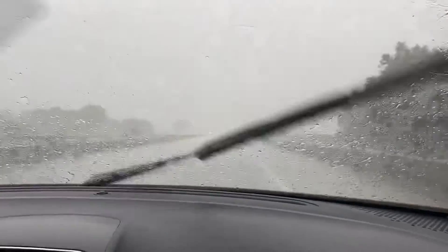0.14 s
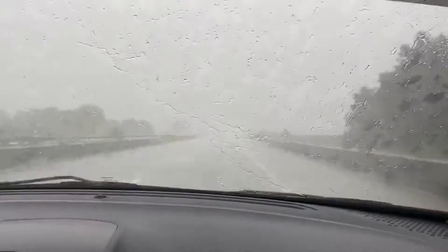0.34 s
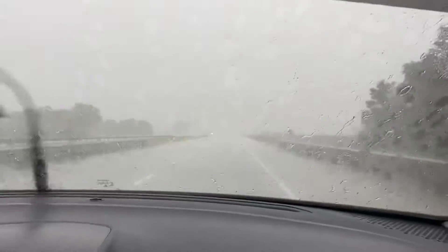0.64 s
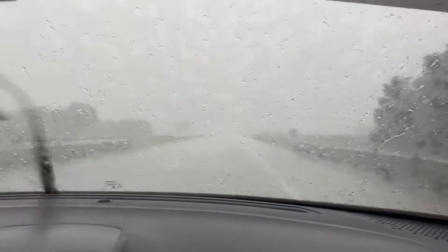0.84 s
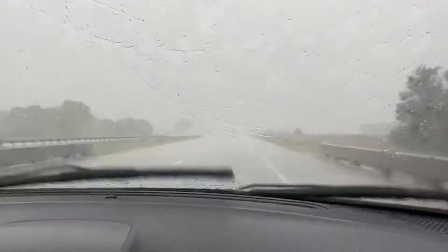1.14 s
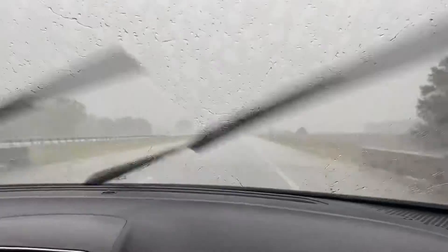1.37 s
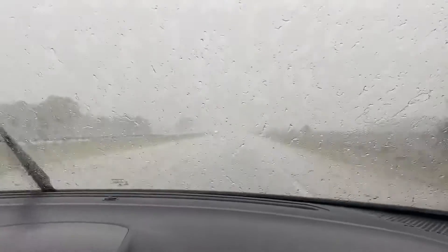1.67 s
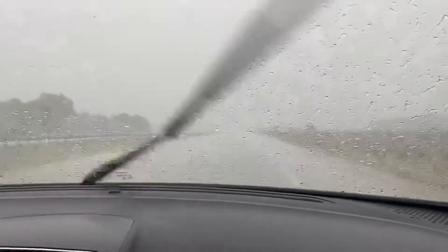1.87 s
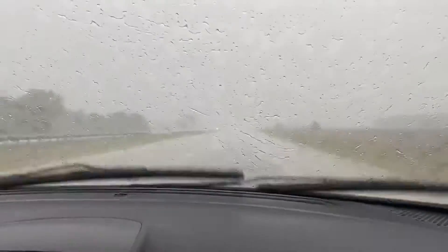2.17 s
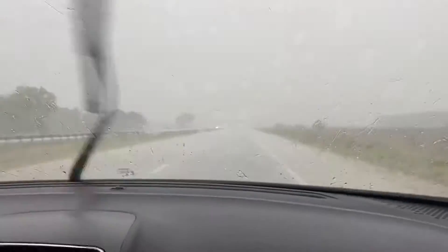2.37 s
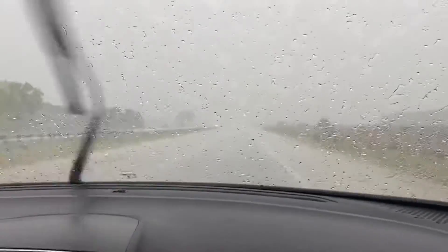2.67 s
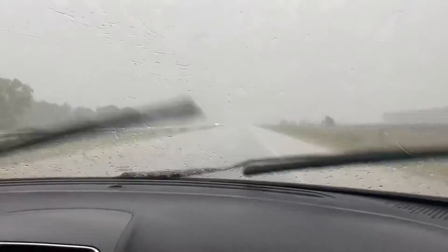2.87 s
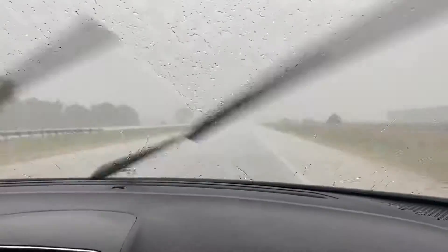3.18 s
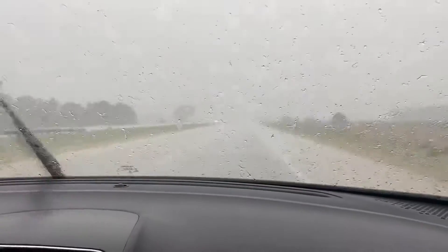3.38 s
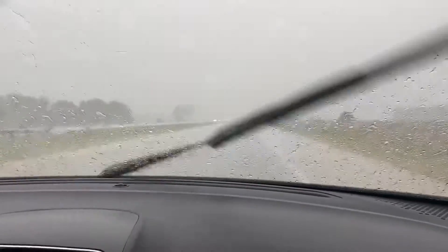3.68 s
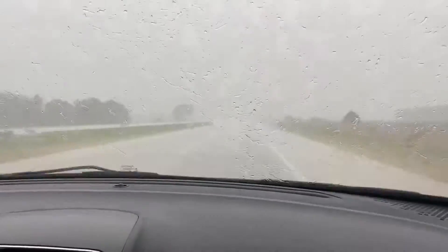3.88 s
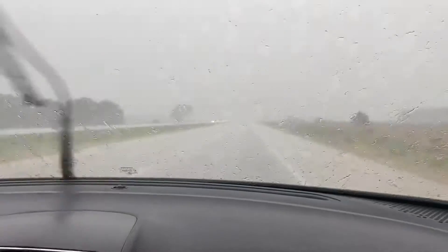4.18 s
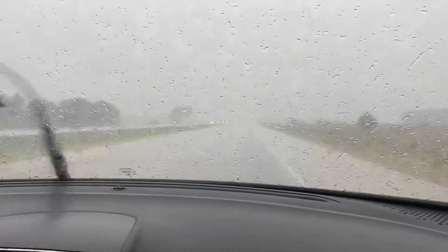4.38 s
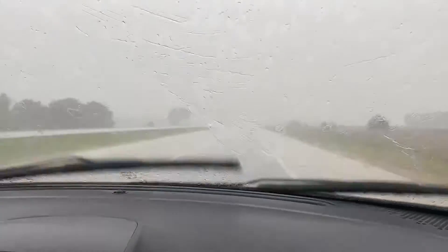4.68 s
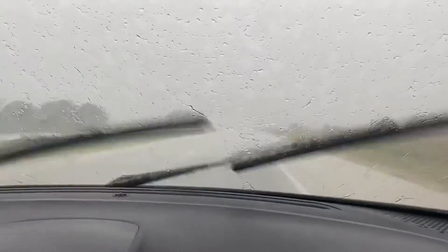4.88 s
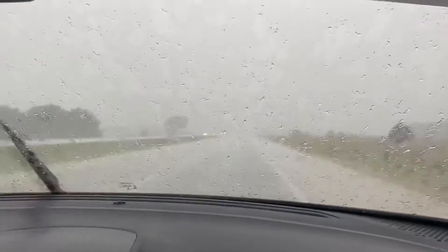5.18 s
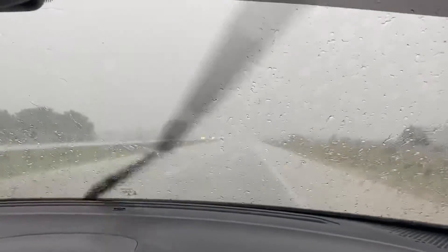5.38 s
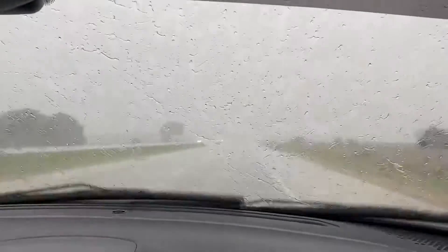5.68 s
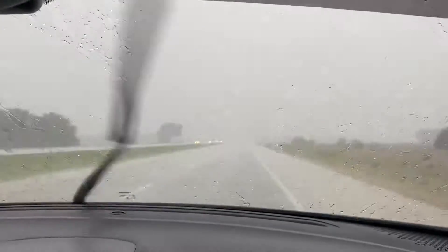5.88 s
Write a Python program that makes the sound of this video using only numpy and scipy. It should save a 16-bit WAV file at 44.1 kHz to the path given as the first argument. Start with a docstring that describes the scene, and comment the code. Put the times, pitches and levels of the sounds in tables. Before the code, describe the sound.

Inside a car driving through a downpour, thousands of drops merge into a dense, steady hiss with fine glassy ticks and occasional bright splats. Underneath runs a low tyre roar with a faint wavering panel hum. Low road thumps, often doubled, crowd the first two and a half seconds, strongest near the start and again just after two seconds; then the ride smooths out. Close stereo microphone in the cabin, short and soft reverberation.

```python
"""Heavy rain on the windshield and roof of a car driving on a wet road, heard from the cabin.
Thousands of drops, made of flickering noise, merge into a hiss, with short glassy ticks and big splats.
Below it the tyres roar (coloured noise, a humming panel and body resonances). Low thumps of the road,
many in pairs a tenth of a second apart, and a few short dull knocks are tones that swell and fade."""
import sys
import numpy as np
from scipy import signal
from scipy.fft import rfft, irfft
from scipy.io import wavfile
from scipy.ndimage import uniform_filter1d

SR = 44100
rng = np.random.default_rng(int(sys.argv[2]) if len(sys.argv) > 2 else 0)


def file_out(sig):
    """Save sig as 16-bit WAV at sys.argv[1]."""
    # one column per channel
    cols = np.atleast_2d(sig).T
    # limit, then scale
    lim = np.clip(cols, -1, 1)
    pcm = np.round(lim * 32767).astype(np.int16)
    wavfile.write(sys.argv[1], SR, pcm)


N = 265923

# How strong the layers are over the drive.
# Each row: time in seconds, rain level in dB, tyre roar level in dB, road texture level in dB.
DRIVE_LEVELS = [(0, -24.5, -24.5, -25), (.4, -24, -24, -22), (.6, -24, -25, -26.5),
                (.85, -25, -25.5, -25.5), (1.1, -25, -26, -25.5), (1.35, -24.5, -25.5, -25),
                (1.6, -24, -26, -21), (1.9, -26, -25.5, -24.5), (2.2, -25, -25, -25.5),
                (2.5, -25.5, -27, -25), (2.58, -25.5, -27.5, -27), (2.9, -26, -26.5, -29),
                (3.2, -26.5, -28.5, -27), (3.5, -25.5, -26, -27.5), (3.75, -26.5, -27.5, -28.5),
                (4.0, -25.5, -26, -27), (4.3, -25.5, -25.5, -26), (4.7, -25.5, -27, -27),
                (5.05, -26, -26.5, -30.5), (5.5, -25.5, -26.5, -26), (6.03, -25, -26.5, -27.5)]
# Colour of rain through glass and roof lining. Each row: frequency in Hz, relative level in dB.
RAIN_COLOUR = [(500, -14), (1000, -6.5), (1330, -5), (1550, -5), (1750, -2.8), (1950, -2.2), (2120, -.7),
               (2400, .4), (2800, -1.1), (3250, -.6), (3450, -2.2), (3900, -3.4), (4400, -3.9),
               (4750, -6.3), (5100, -7), (5700, -8.8), (6150, -8.8), (6700, -10), (7300, -9.5),
               (8000, -10.5), (8350, -12.5), (9000, -12), (12200, -17), (13000, -19), (15600, -23.5)]
# The largest drops on the glass. Each row: start in seconds, level in dB.
BIG_DROPS = [(0.9506, -12), (.9648, -17), (1.6506, -18), (1.7278, -15.5), (2.088, -22), (2.3062, -16),
             (2.3755, -20), (2.6582, -14.5), (3.069, -19), (3.542, -15), (3.838, -18), (4.3, -17),
             (5.137, -16.5), (5.323, -19), (5.7089, -17), (5.883, -21), (6.005, -17)]


def gain_of(db):
    """Turns decibels into a factor for the amplitude."""
    return 10 ** (np.asarray(db) / 20)


def evened(x):
    """Scales a sound to an rms (average strength) of 1."""
    return x / np.sqrt(np.mean(x ** 2) + 1e-20)


def read(hz, points, values):
    """Reads a curve of straight lines on a log-frequency axis."""
    return np.interp(np.log(hz + 1), np.log(np.asarray(points) + 1), values)


def colour(x, spectrum):
    """Makes some pitches louder than others, by a table of Hz and dB, and evens the result."""
    hz = np.fft.rfftfreq(N, 1 / SR)
    gain = gain_of(read(hz, *np.transpose(spectrum)))
    return evened(irfft(rfft(x) * gain, N))


def bandpass(x, order, edges_hz):
    """Keeps the band between two frequencies."""
    return signal.sosfilt(signal.butter(order, edges_hz, "band", fs=SR, output="sos"), x)


def resonate(x, hz, width_hz):
    """Lets noise shake one resonance, which answers mostly at its own pitch."""
    return evened(signal.lfilter(*signal.iirpeak(hz, hz / width_hz, SR), x))


def control(table, column):
    """Turns a dB column of a table over time into a gain for every sample."""
    columns = np.transpose(table)
    return gain_of(np.interp(np.arange(N) / SR, columns[0], columns[column]))


def road(lumpy_db=1.0):
    """Tyre roar and spray, one humming panel, and body resonances shaken harder on rough stretches."""
    # Steady roar in the wheel wells. Each row: frequency in Hz, relative level in dB.
    roar_colour = [(22, -11), (32, -10.5), (60, -3), (120, -5), (160, 2), (220, -6), (340, -5), (440, -6.5),
                   (480, -11.5), (560, -8.5), (900, -11.5), (1500, -15), (3000, -68)]
    # A humming band, likely a trim panel. One row: low edge in Hz, high edge in Hz, base level in dB.
    panel_band = (620, 685, -14)
    # The hum comes and goes. Each row: time in seconds, dB added to its base level.
    hum_levels = [(0, 2), (.6, 0.5), (1.1, 4.5), (1.55, 5), (1.8, -2), (2.1, 1), (2.7, 3.5), (3.1, 5),
                  (3.7, 1.5), (4.2, 3), (4.5, -2), (5.2, 2), (5.5, -3), (5.8, 4), (6.03, 5)]
    # Body resonances. Each row: pitch in Hz, width of each filter pass in Hz, relative level in dB.
    body_modes = [(48.8, 23, -6), (91, 24, -4), (113.4, 23.5, -8.5), (156.5, 20.5, -15), (219.3, 7.6, -20)]

    roar, hum, *texture = rng.standard_normal((2 + len(body_modes), 2, N))
    low_hz, high_hz, hum_db = panel_band
    panel = gain_of(hum_db) * evened(bandpass(hum, 3, (low_hz, high_hz)))
    panel *= control(hum_levels, column=1)

    lumps = uniform_filter1d(rng.standard_normal(N), size=900)
    lumps = evened(uniform_filter1d(lumps, size=900))  # water thrown in lumps
    roar = colour(roar * gain_of(lumpy_db * lumps), roar_colour)

    body = np.zeros((2, N))
    for noise, (hz, width_hz, db) in zip(texture, body_modes):
        once = resonate(noise, hz, width_hz)
        body += gain_of(db) * resonate(once, hz, width_hz)

    roar_gain = control(DRIVE_LEVELS, column=2)
    texture_gain = control(DRIVE_LEVELS, column=3)
    return roar_gain * (roar + panel) + texture_gain * evened(body)


def swelling_tones(starts, t60, rise_s):
    """Each tone (s, dB, Hz) swells for a moment, then fades by 60 dB in t60 seconds."""
    out = np.zeros(N)
    t = np.arange(SR // 2) / SR
    swell = np.sin(np.pi / 2 * np.minimum(t / rise_s, 1))
    shape = swell * gain_of(-60 * np.maximum(t - rise_s, 0) / t60)
    shape /= shape.max()
    for start_s, db, hz in starts:
        part = out[round(start_s * SR):][:len(t)]
        tone = -np.sin(2 * np.pi * hz * t)
        part += (gain_of(db) * shape * tone)[:len(part)]
    return out


def low_thumps():
    """Low thumps of the road, each a short tone followed by a second one, and slower, deeper heaves."""
    # Low thumps of the road, many in pairs a tenth of a second apart.
    # Each row: first start in seconds, first peak in dB, second peak in dB, pitch in Hz.
    thump_rows = [(0.033, -12.5, -15, 80), (.048, -18, -11, 101), (0.247, -9.5, -11, 80),
                  (0.284, -4, -6, 89.4), (0.308, -18, -12, 91), (.366, -24, -11, 86), (.57, -17, -20, 94),
                  (.586, -18, -14, 98), (.763, -18.5, -25, 88), (.937, -15.5, -16, 95.7),
                  (1.051, -24, -16, 94), (1.206, -19, -25, 91), (1.362, -12, -19, 99),
                  (1.487, -18.5, -14, 89), (1.52, -14.5, -24, 91), (1.609, -22, -10, 99.3),
                  (1.68, -14, -14, 103), (1.737, -25, -15, 96), (1.801, -28, -16, 97),
                  (2.055, -19, -18, 85.5), (2.113, -18.5, -20, 93), (2.272, -5.5, -6.5, 90.8),
                  (2.297, -19, -11, 88.7), (2.434, -20, -23, 88), (2.462, -26, -18, 90),
                  (5.106, -25, -15, 80)]
    # Slower heaves of the cabin air. Each row: start in seconds, peak in dB.
    heave_rows = [(.069, -10.5), (.26, -14), (.33, -19), (.382, -10), (0.459, -14), (.655, -24),
                  (1.415, -22), (1.655, -18), (1.905, -17), (2.043, -23), (2.394, -14), (2.448, -14),
                  (5.31, -22), (5.855, -21), (5.941, -18)]

    pair_gap_s, heave_hz = 0.102, 49.3
    first = [(s, db, hz) for s, db, _, hz in thump_rows]
    second = [(s + pair_gap_s, db, hz) for s, _, db, hz in thump_rows]
    heaves = [(s, db, heave_hz) for s, db in heave_rows]
    pairs = swelling_tones(first + second, t60=0.12, rise_s=0.019)
    return pairs + swelling_tones(heaves, t60=0.23, rise_s=0.021)


def dull_knocks():
    """Short dull low-mid knocks in the roar, source unclear: tones that die at once."""
    # Each row: start in seconds, peak in dB, pitch in Hz.
    knock_rows = [(0.467, -24, 367), (0.753, -18, 315), (1.56, -22, 326), (1.888, -18, 334),
                  (2.13, -19, 320), (4.878, -17, 385), (5.483, -18.5, 388), (5.679, -18, 350)]
    return swelling_tones(knock_rows, t60=0.029, rise_s=0.00091)


def ticks(per_s=1400, spread_db=5.5, share_db=-6.5, cycles=1.0, tail_db=-2.5, t60=0.05):
    """First contact of near drops: a few quick cycles of glass, each spot with its own pitch."""
    spots_hz = np.geomspace(1500, 11000, num=32)
    t = np.arange(300) / SR
    landed = rng.random(N) < per_s / SR
    size = landed * gain_of(spread_db * np.minimum(rng.exponential(1, N), 3))
    spot = rng.integers(0, len(spots_hz), N)
    sign = rng.choice([-1., 1.], (2, N))  # each port gets its own push or pull
    out = np.zeros((2, N))
    for k, hz in enumerate(spots_hz):
        ring = np.exp(-t * hz / cycles) * np.sin(2 * np.pi * hz * t)
        ring *= gain_of(read(hz, *np.transpose(RAIN_COLOUR))) * hz / 3000  # lifts the shorter high rings
        out += signal.oaconvolve(sign * size * (spot == k), ring[None], axes=1)[:, :N]

    life_s = np.arange(2000) / SR
    echo = rng.standard_normal((2, len(life_s))) * gain_of(-60 * life_s / t60)
    tail = evened(signal.oaconvolve(out, echo, axes=1)[:, :N])  # the cabin answers each tick
    mixed = evened(evened(out) + gain_of(tail_db) * tail)
    return control(DRIVE_LEVELS, column=1) * gain_of(share_db) * mixed


def cracks():
    """The largest drops start with a short bright crack and a few cycles of ringing glass."""
    crack_db, crack_t60 = -6, 0.012  # level against the drop's table level, seconds to fall 60 dB
    ping_db, ping_t60, ping_rise_s, ping_hz = 1, 0.011, 0.0007, 3800
    out = np.zeros((2, N))
    t = np.arange(800) / SR
    clicks = rng.choice([-1., 1.], (len(BIG_DROPS), 2, len(t)))
    bursts = bandpass(clicks, 1, (2200, 9000)) * gain_of(crack_db - 60 * t / crack_t60)

    detune = rng.uniform(.85, 1.15, (len(BIG_DROPS), 2, 1))  # each spot has its own pitch
    pings = np.sin(2 * np.pi * ping_hz * detune * t) * np.minimum(t / ping_rise_s, 1)
    pings *= gain_of(ping_db - 60 * t / ping_t60)
    for (start_s, db), burst, ping in zip(BIG_DROPS, bursts, pings):
        part = out[:, round(start_s * SR):][:, :len(t)]
        part += gain_of(db) * (burst + ping)[:, :part.shape[1]]
    return out


def add_splats(power, hz, hop, rain_gain, crest_db=5.0):
    """A big drop adds a broad burst of noise power around a centre pitch, with fizz above, then fades."""
    centre_hz, fizz, t60 = 3480, 0.29, 0.041
    bump = np.exp(-(np.log((hz + 1) / centre_hz) / 1.3) ** 2)
    spread = fizz * (hz > centre_hz) + bump
    for start_s, db in BIG_DROPS:
        at = round(start_s * SR / hop) + 2
        part = power[at:at + 80]
        life_s = np.arange(len(part))[:, None] * hop / SR
        # noise peaks above its average strength, hence crest_db; the rain gain is applied again later
        amplitude = gain_of(db - crest_db - 60 * life_s / t60) / rain_gain[at * hop]
        part += amplitude ** 2 * spread


def rain(per_s=1500, spread_db=2.5, t60=0.018, wash_low=0.83, wash_high=0.5, gust_db=0.51,
         patch_db=0.7, brighten=0.88):
    """Each drop lifts a wide patch of noise at once and dies in the soft cabin; far drops blur to a wash."""
    hop, bins = 32, 65  # samples between frames, frequency steps in a frame
    frames = N // hop + 5
    hz = np.linspace(0, SR / 2, bins)

    landed = rng.random((frames, bins)) < per_s * hop / SR / bins
    size = np.minimum(rng.exponential(1, (frames, bins)), 3.2)
    drops = landed * gain_of(spread_db * size) ** 2
    drops = uniform_filter1d(drops, size=16, axis=1)
    drops = uniform_filter1d(drops, size=12, axis=1)  # a drop spans several kHz
    drops /= drops.mean()
    fade = gain_of(-60 * hop / SR / t60) ** 2  # power left after one frame
    near = signal.lfilter([1 - fade], [1, -fade], drops, axis=0)
    # only near drops carry high treble, so the steady wash has a smaller share there
    wash = np.clip(np.interp(hz, [3000, 12000], [wash_low, wash_high]), 0, 1)
    power = wash + (1 - wash) * near

    gusts = evened(uniform_filter1d(rng.standard_normal(frames), size=30))
    power *= gain_of(gust_db * gusts)[:, None] ** (2 + hz / 6000)  # sheets of rain, strongest in the treble
    patches = uniform_filter1d(rng.standard_normal((frames, bins)), size=40, axis=0)
    patches = evened(uniform_filter1d(patches, size=4, axis=1))
    power *= gain_of(patch_db * patches) ** 2  # parts of glass and roof take turns

    rain_gain = control(DRIVE_LEVELS, column=1)
    strength = rain_gain[np.minimum(np.arange(frames) * hop, N - 1)] / rain_gain.mean()
    power *= strength[:, None] ** (brighten * hz / 10000)  # harder rain is brighter
    add_splats(power, hz, hop, rain_gain)

    shape = (2, frames, bins)
    noise = rng.standard_normal(shape) + 1j * rng.standard_normal(shape)
    grid = (noise * np.sqrt(power)).transpose(0, 2, 1)
    hiss = signal.istft(grid, nperseg=128, noverlap=96)[1][:, :N]
    return rain_gain * colour(hiss, RAIN_COLOUR)


def scene():
    """Rain and roar reach two ports partly alike, by pitch; thumps and knocks come to both in step."""
    # The two microphone ports. Each row: frequency in Hz, likeness from -1 to 1,
    # phase by which the right port leads in radians, left minus right level in dB.
    port_rows = [(30, .98, 0, 2), (60, .93, 0, 2.5), (95, .93, 0, 3), (140, .87, 0, .6), (210, .57, 0, 1.5),
                 (330, .71, 0, 3.5), (500, .32, 0, 3.5), (650, .4, 0, 1.5), (770, .26, 0, 4),
                 (1150, 0.01, 0, 1.5), (1400, -.35, 0, 1.1), (1800, .2, .8, 2.2), (2300, .6, .2, 1.1),
                 (3000, .7, -.6, 4.6), (3500, .75, -.3, 3), (4500, .8, 0, 2.5), (5100, .6, 0, 3.2),
                 (5600, .45, 0, 2.5), (6500, .88, 0, .3), (7300, .94, .2, 0), (16000, .96, .2, 0)]
    lead_s, lead_from_hz = 0.00024, 7020  # above this the right port hears the treble earlier still

    shared, twin = rfft(road() + ticks() + cracks() + rain())  # two rows of sound
    knocks = rfft(low_thumps() + dull_knocks())
    hz = np.fft.rfftfreq(N, 1 / SR)
    points, *columns = np.transpose(port_rows)
    like, lead, balance_db = (read(hz, points, column) for column in columns)
    like = np.clip(like, -1, 1)
    lead = lead + 2 * np.pi * lead_s * np.maximum(hz - lead_from_hz, 0)

    # the right port mixes a shifted copy of the left with the twin, keeping the power
    right = like * np.exp(1j * lead) * shared + np.sqrt(1 - like ** 2) * twin
    left_out = (shared + knocks) * gain_of(balance_db / 2)
    right_out = (right + knocks) * gain_of(-balance_db / 2)
    return irfft(np.array([left_out, right_out]), N)


def record(dry):
    """The input stage slightly squeezes the loudest peaks; then a filter removes the highest treble."""
    squeezed = 1.615 * np.tanh(dry / 1.593)
    lowpass = signal.firwin(1023, 15730, window=("kaiser", 9), fs=SR)  # cutoff in Hz
    return signal.oaconvolve(squeezed, lowpass[None], "same")


dry = scene()
out = record(dry)
file_out(out)
```